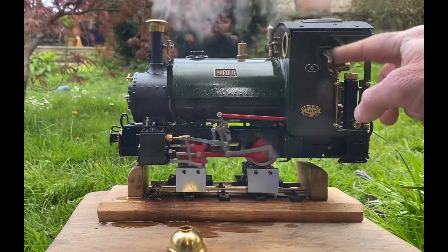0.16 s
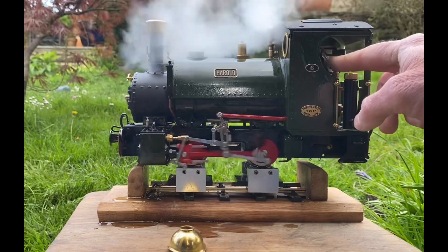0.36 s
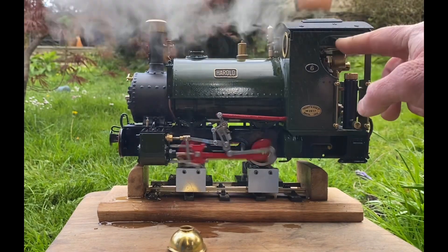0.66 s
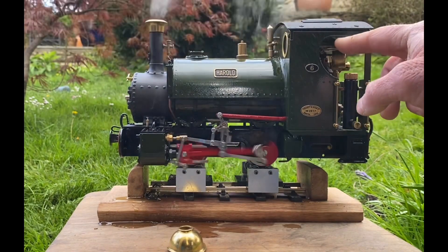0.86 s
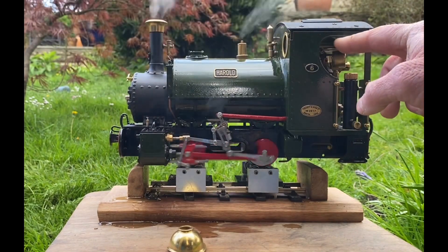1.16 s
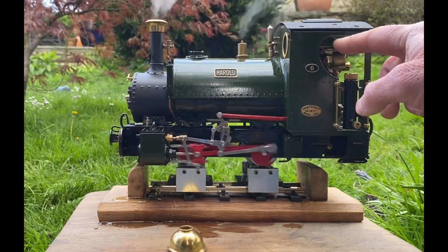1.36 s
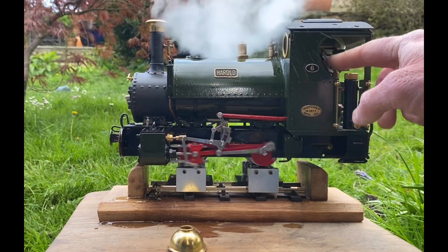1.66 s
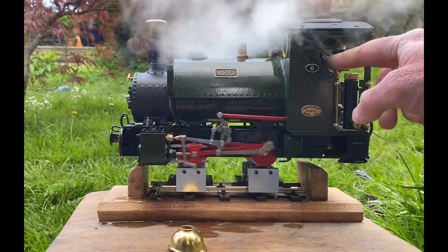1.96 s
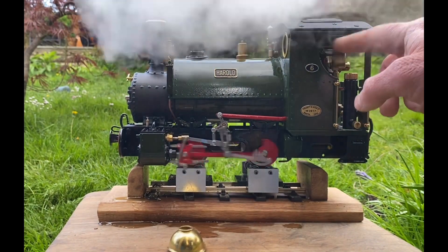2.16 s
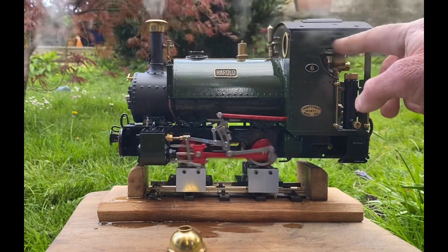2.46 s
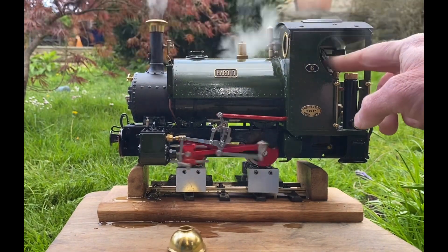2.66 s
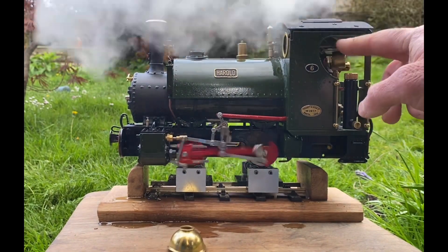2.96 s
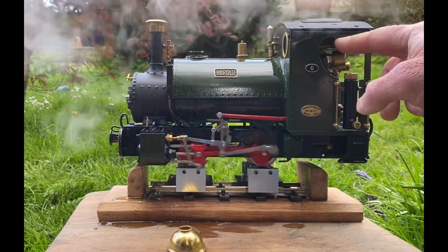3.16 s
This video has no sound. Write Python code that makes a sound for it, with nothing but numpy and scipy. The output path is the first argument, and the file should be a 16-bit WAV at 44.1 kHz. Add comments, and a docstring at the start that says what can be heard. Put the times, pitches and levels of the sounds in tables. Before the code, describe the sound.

Fast, even puffing from a miniature steam engine continues throughout, over a faint outdoor rumble. Its whistle lets out four brief bursts of bright hissing steam with no note, one first and then three closer together, with soft wet spits.

```python
"""A garden: a small live-steam locomotive spins its wheels on a roller stand, over a low outdoor rumble.
Four exhaust beats a turn ring in the smokebox and chimney; a steam leak fizzes in time with them.
Four pushes on the whistle valve let out toneless blasts of hissing steam, with dull wet spits.
In stereo, the treble hiss alternates between centred and wide frequency bands."""
import sys
import numpy as np
from scipy import signal
from scipy.fft import rfft, irfft
from scipy.io import wavfile

SR = 44100
rng = np.random.default_rng(int(sys.argv[2]) if len(sys.argv) > 2 else 0)


def store_pcm(level_fs):
    """Save levels as 16-bit WAV."""
    pcm = np.round(np.clip(level_fs, -1, 1) * 32767).astype(np.int16)
    wavfile.write(sys.argv[1], SR, np.atleast_2d(pcm).T)


N = 145530
TIME_S = np.arange(N) / SR
CRACKLE = 0.14   # log-amplitude spread of steam noise

# wheel turns: start_s, exhaust_db
WHEEL_TURNS = [(-.09, -30), (0.039, -32), (0.164, -30), (0.296, -35), (0.424, -33.5), (0.558, -31),
               (.674, -31), (0.804, -32), (0.927, -32), (1.07, -32.5), (1.208, -31.5), (1.346, -32.5),
               (1.488, -33), (1.626, -34.5), (1.776, -33), (1.931, -36.5), (2.074, -34), (2.215, -31.5),
               (2.341, -31), (2.474, -31.5), (2.616, -35.5), (2.756, -35), (2.898, -30.5), (3.029, -30),
               (3.152, -33), (3.284, -32)]


def from_db(db):
    """dB to gain."""
    return 10 ** (np.asarray(db) / 20)


def unit_rms(x):
    """Scale to rms 1."""
    return x / np.sqrt(np.mean(x ** 2) + 1e-20)


def at_bins(points, column=1):
    """Table column at each FFT bin, interpolated over log frequency."""
    table, hz = np.array(points), np.fft.rfftfreq(N, 1 / SR)
    return np.interp(np.log(hz + 1), np.log(table[:, 0]), table[:, column])


def drift(rate_hz):
    """Low-passed random wander, rms 1."""
    lowpass = signal.butter(2, rate_hz, fs=SR / 20, output="sos")
    slow = signal.sosfilt(lowpass, rng.standard_normal(N // 20 + 2002))[2000:]
    return np.interp(np.arange(N) / 20, np.arange(len(slow)), unit_rms(slow))


def hiss(crackle=0.):
    """Two uncorrelated white noises with a common grain."""
    return unit_rms(rng.standard_normal((2, N)) * np.exp(crackle * drift(rate_hz=580)))


def coloured(x, spectrum):
    """Filter to a spectrum shape; white noise keeps its rms."""
    return irfft(rfft(x) * unit_rms(from_db(at_bins(spectrum))), N)


def resonance(x, hz, width_hz):
    """Two-pole band-pass, run twice for deep valleys."""
    radius = np.exp(-np.pi * width_hz / SR)
    b = (1 - radius ** 2) / 2 * np.array([1, 0, -1])
    a = [1, -2 * radius * np.cos(2 * np.pi * hz / SR), radius ** 2]
    for _ in range(2):
        x = signal.lfilter(b, a, x)
    return x * np.sqrt(SR / width_hz)


def outdoor_rumble(level_db=-54.5):
    """Steady low noise."""
    # rumble spectrum: freq_hz, density_db
    spectrum = [(15, -35), (30, -30), (49, -6), (64, 4), (107, -6), (160, 0), (201, -6.5), (300, -9),
                (390, -53)]
    return from_db(level_db) * coloured(hiss(), spectrum)


def steam_leak(pressure, lag_s=0.0013, steady_db=-11.5, gain_db=2):
    """A leak fizzes just after each beat."""
    late = np.interp(TIME_S - lag_s, TIME_S, pressure)
    flow = (late + from_db(steady_db)) * hiss()
    return from_db(gain_db) * resonance(flow, hz=9500, width_hz=850)


def exhaust_beats():
    """Pressure and opening puffs: each valve opening rises fast, sags, then shuts."""
    # beats of one turn: opens_turns, open_for_turns, level_db, puff_re_beat_db
    beats = [(.012, 0.17, -0.75, -1), (.24, 0.18, 0.45, -4), (.465, 0.18, 0.22, -12.5),
             (.725, 0.16, -0.5, -12.5)]
    rise_turns, sag_turns, shut_turns, puff_turns = 0.052, 0.18, 0.094, 0.035
    jitter_turns, spread_db = 0.017, 1.53
    starts_s = np.array(WHEEL_TURNS)[:, 0]
    starts_s = np.append(starts_s, 2 * starts_s[-1] - starts_s[-2])
    turns = np.interp(TIME_S, starts_s, np.arange(len(starts_s))) + jitter_turns * drift(rate_hz=15.6)
    scatter_db = spread_db * rng.standard_normal((len(starts_s) + 1, len(beats)))
    pressure = puffs = 0
    for k, (opens, open_for, level_db, puff_db) in enumerate(beats):
        since = (turns - opens) % 1
        turn_index = np.floor(turns - opens).astype(int) + 1
        gate = np.clip(since / rise_turns, 0, 1) * np.clip((open_for - since) / shut_turns + 1, 0, 1)
        opening = from_db(level_db + scatter_db[turn_index, k]) * np.sin(np.pi / 2 * gate) ** 2
        pressure += opening * np.exp(-since / sag_turns)
        puffs += from_db(puff_db) * opening * np.exp(-np.abs(since - rise_turns) / puff_turns)
    return pressure, puffs


def chimney(pressure, puffs, puff_db_per_octave=-6):
    """Exhaust noise rings smokebox and chimney; puffs drive mostly the low modes."""
    # resonances: freq_hz, width_hz, level_db, steady_flow_db
    modes = [(855, 112, -9, -4.5), (1378.4, 67, -12, -9), (2025, 456, -5, -7), (2682, 180, -13, -7),
             (3104, 390, -11, -21), (3990, 160, -13.5, -13), (4303, 140, -13, -12), (4597, 130, -18, -14.5)]
    # swell of the lowest mode: time_s, gain_db
    swell = [(0, -2), (.22, 0.5), (.78, -1), (.86, 4), (.93, 2.5), (1.1, -0.5), (1.4, -3), (1.6, 1),
             (1.8, -2), (1.87, 6), (2.08, -2.5), (2.23, 1.5), (2.58, -3.5), (2.63, 6), (2.85, -3),
             (3.08, 0), (3.3, -2)]
    lowest_hz = modes[0][0]
    rings = []
    for hz, width_hz, level_db, steady_db in modes:
        puff_db = puff_db_per_octave * np.log2(hz / lowest_hz)
        flow = pressure + from_db(puff_db) * puffs + from_db(steady_db)
        rings.append(from_db(level_db) * resonance(flow * hiss(CRACKLE), hz, width_hz))
    rings[0] *= from_db(np.interp(TIME_S, *np.transpose(swell)))
    return sum(rings)


def exhaust_rush(pressure, steady_db=-4, gain_db=-1.5):
    """Broad steam noise, pulsing over a steady flow."""
    # rush spectrum: freq_hz, density_db
    spectrum = [(200, -20), (450, -14), (700, -5.5), (1100, -5), (1260, -7), (1420, -2.5), (1800, 2),
                (2300, 0.5), (2860, -5), (3500, -4), (4150, -10.5), (4800, -7), (5300, -11), (6000, -15.5),
                (7000, -14), (8300, -10.5), (10900, -33), (11600, -17), (13300, -21), (15200, -12.5)]
    flow = (pressure + from_db(steady_db)) * hiss(CRACKLE)
    return from_db(gain_db) * coloured(flow, spectrum)


def engine():
    """The beats drive chimney, rush and leak; the level varies turn by turn."""
    start_s, exhaust_db = np.transpose(WHEEL_TURNS)
    gain = from_db(np.interp(TIME_S, start_s + 0.08, exhaust_db))   # each level applies near mid-turn
    pressure, puffs = exhaust_beats()
    return gain * (chimney(pressure, puffs) + exhaust_rush(pressure) + steam_leak(pressure))


def wet_spits():
    """Wet steam spits dully as the whistle valve opens and shuts."""
    # spits: centre_s, length_s, level_db
    spits = [(0.24, 0.11, -35.5), (0.46, 0.034, -37.5), (1.597, 0.07, -33.5), (2.086, 0.044, -36.5),
             (2.677, 0.2, -39), (2.864, 0.029, -35.5)]
    # spit spectrum: freq_hz, density_db
    spectrum = [(200, -14), (330, 3), (600, 7), (1100, 6), (1800, -24)]
    envelope = sum(from_db(level_db) * np.exp(-8 * ((TIME_S - centre_s) / length_s) ** 2)
                   for centre_s, length_s, level_db in spits)
    return coloured(envelope * hiss(CRACKLE), spectrum)


def whistle(jet_db=13, flicker_db=1, edge_s=0.006):
    """Toneless steam blasts: bright jet, broad nozzle ring, duller hiss below."""
    # one envelope per blast: time_s, base_db, ring_re_base_db, dull_re_base_db
    blasts = [
        [(0.16, -72, 2, -2), (0.188, -35.5, 4, 6), (0.24, -29.5, 7.5, -2), (0.31, -32, 4, 1.5),
         (0.464, -34, 7.5, -2.5), (0.518, -54, 4, 8), (0.56, -56, 4, -2)],
        [(1.51, -77, 2, -2), (1.526, -59, -6, -2), (1.538, -37, 6, 5), (1.58, -31, -2, -2.5),
         (1.608, -30.5, 7.5, -2.5), (1.686, -34.5, 6.5, 5), (1.74, -68, 3, -3)],
        [(1.84, -68, 8, -1), (1.868, -29, 1, 0.5), (1.902, -30, 5.5, -1.5), (2.01, -30, 3.5, -4.5),
         (2.108, -35.5, 5.5, 0.5), (2.124, -42, 4, -2), (2.2, -58, -1, -10)],
        [(2.6, -83, -6, -6), (2.624, -35.5, 5.5, -1), (2.66, -30, -0.5, 0), (2.728, -29, 6.5, -1),
         (2.838, -32.5, 6, 0.5), (2.866, -30, 4.5, -1.5), (2.928, -54, 3, 4)],
    ]
    # jet, nozzle ring and dull hiss spectra: freq_hz, density_db
    jet = [(1500, -60), (4000, -26), (6000, -9), (7600, -4), (8200, -4), (9200, -1), (10200, -4),
           (11000, -2), (12200, -2), (13500, -6), (14500, -3), (15300, -2)]
    nozzle_ring = [(2500, -50), (4500, -20), (5600, -8), (6300, -5), (6800, 1.5), (7300, -4), (7800, -8.5),
                   (8500, -18)]
    dull_hiss = [(200, -37), (400, -19.5), (680, -7.5), (1100, -8), (1600, -12.5), (2800, -10.5),
                 (4000, -7), (5200, -10), (6500, -8), (9000, -45)]
    envelopes = np.zeros((3, N))
    for blast in blasts:
        time_s, base_db, ring_db, dull_db = np.transpose(blast)
        gate = np.clip(np.minimum(TIME_S - time_s[0], time_s[-1] - TIME_S) / edge_s, 0, 1)
        for envelope, offset_db in zip(envelopes, (jet_db, ring_db, dull_db)):
            envelope += gate * from_db(np.interp(TIME_S, time_s, base_db + offset_db))
    steam = 0
    for envelope, spectrum in zip(envelopes, (jet, nozzle_ring, dull_hiss)):
        flicker = from_db(flicker_db * drift(rate_hz=32))
        steam += coloured(envelope * flicker * hiss(), spectrum)
    return steam


def stereo_image(pair, coherence_column):
    """Left/right phase, coherence and balance by frequency; treble bands alternate centred and wide."""
    # stereo image: freq_hz, left_lead_half_turns, engine_coherence, engine_left_re_right_db,
    # whistle_coherence, whistle_left_re_right_db
    image = [(50, .01, .985, .5, .98, .5), (300, .01, .92, 1.1, .97, 1.1), (800, -.04, .97, -.5, .95, .3),
             (1050, -.02, .97, .1, .95, .3), (1300, .1, .75, 3, .75, 3), (1650, .25, .85, 1.6, .85, 1.1),
             (2050, .25, .92, -.5, .85, .1), (2620, .25, .88, 1.5, .95, .3), (2950, .2, .5, 4, .55, 2.1),
             (3700, .3, .4, 6, .5, 2.1), (4400, .01, .75, 5, .92, .6), (5600, .05, .5, 6, .95, .3),
             (6400, 0, 1, 0, 1, 0), (7450, 0, 1, 0, 1, 0), (8000, -.45, .65, 0, .65, 0),
             (8500, -1, 1, 0, 1, 0), (9150, -1, 1, 0, 1, 0), (10200, -1.55, .75, 0, .6, 0),
             (10700, -2, 1, 0, 1, 0), (11600, -2, 1, 0, 1, 0), (12100, -2.5, .5, 0, .6, 0),
             (12500, -3, 1, 0, 1, 0), (13700, -3, 1, 0, 1, 0), (14250, -3.5, .55, 0, .6, 0),
             (15000, -4, 1, 0, 1, 0)]
    common, unshared = rfft(pair)
    side = np.array([[1], [-1]])   # left, right
    coherence = np.clip(at_bins(image, coherence_column), 0, .9995)
    phase = np.exp(.5j * np.pi * side * at_bins(image))
    balance = from_db(side * at_bins(image, coherence_column + 1) / 2)
    blend = np.sqrt((1 + coherence) / 2) * common + side * np.sqrt((1 - coherence) / 2) * unshared
    return irfft(phase * balance * blend, N)


def scene():
    """Rumble and engine plus spits and whistle, in stereo."""
    running = stereo_image(outdoor_rumble() + engine(), coherence_column=2)
    blasts = stereo_image(wet_spits() + whistle(), coherence_column=4)
    return running + blasts


def record(dry):
    """Steep elliptic low-pass."""
    cutoff_hz = 15750
    return signal.sosfilt(signal.ellip(12, .5, 80, cutoff_hz, fs=SR, output="sos"), dry)


dry = scene()
out = record(dry)
store_pcm(out)
```